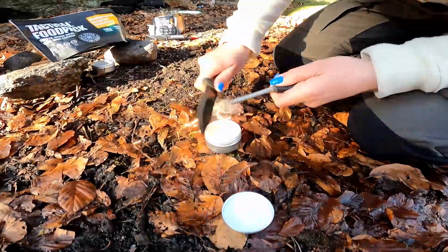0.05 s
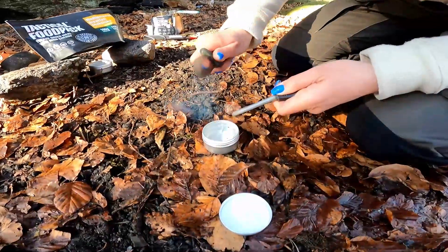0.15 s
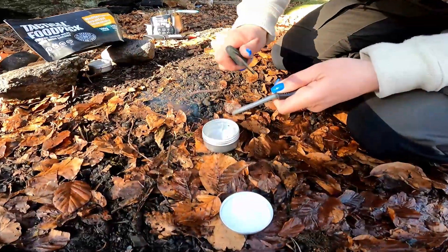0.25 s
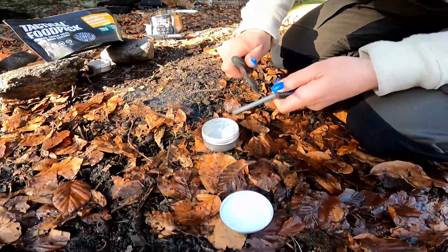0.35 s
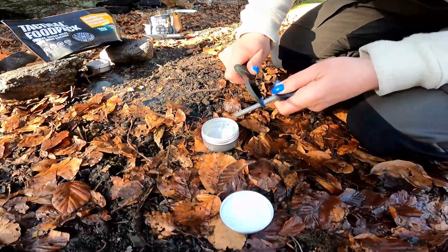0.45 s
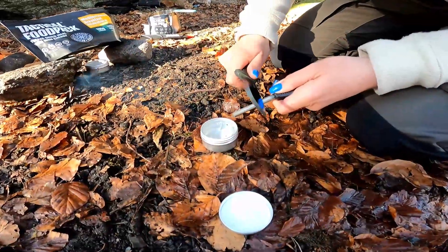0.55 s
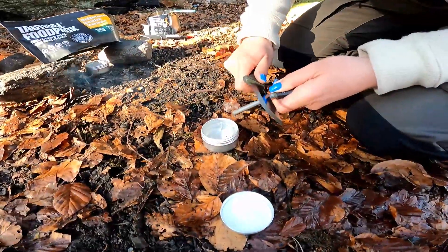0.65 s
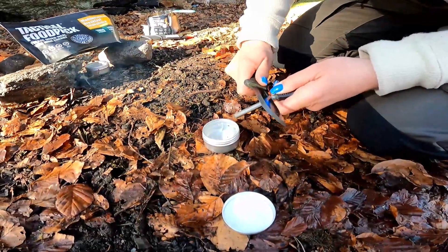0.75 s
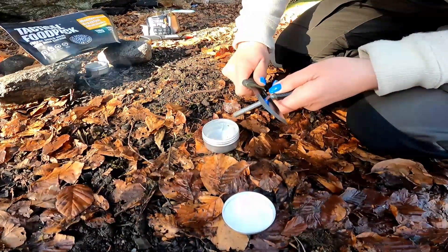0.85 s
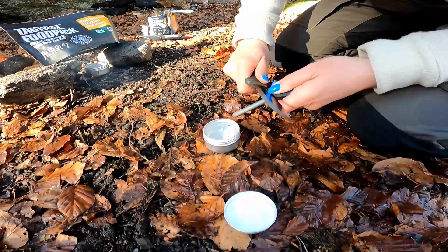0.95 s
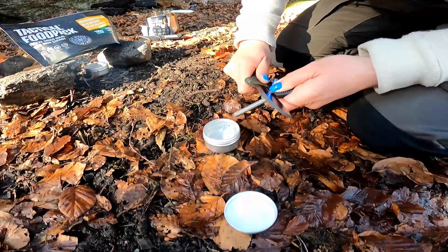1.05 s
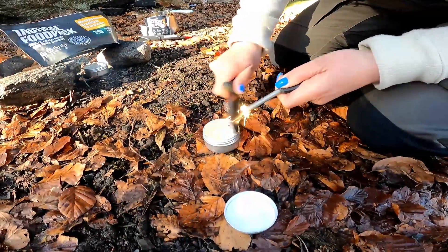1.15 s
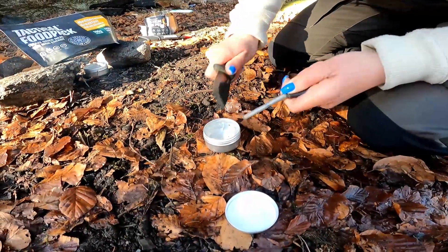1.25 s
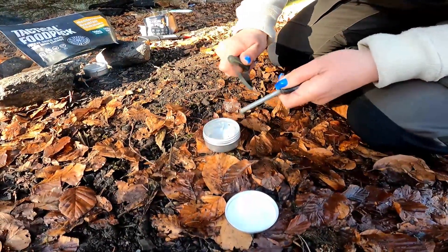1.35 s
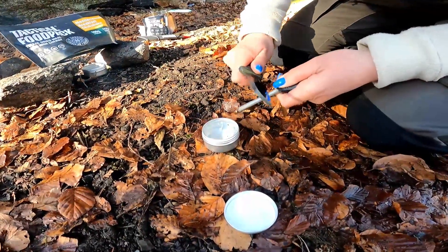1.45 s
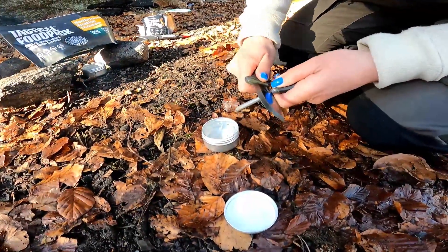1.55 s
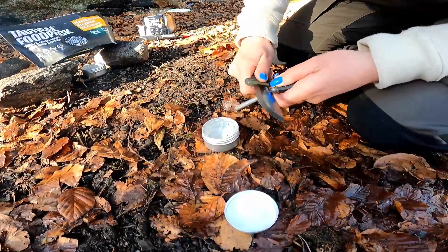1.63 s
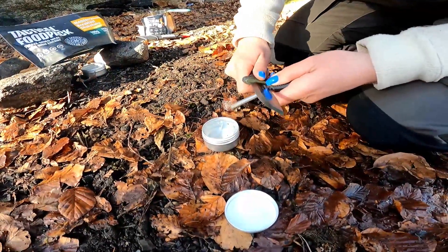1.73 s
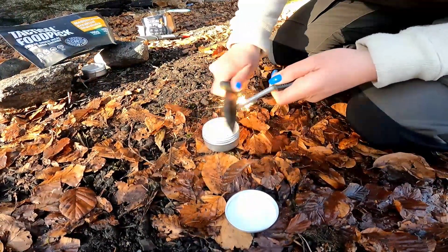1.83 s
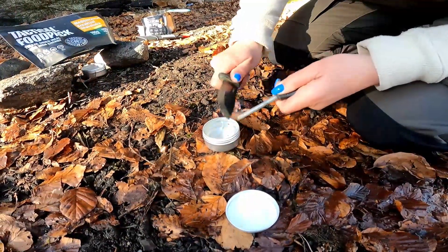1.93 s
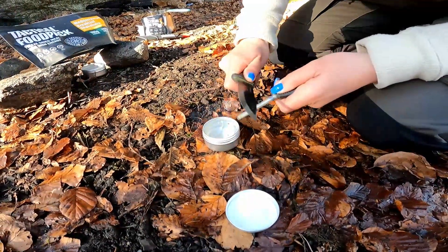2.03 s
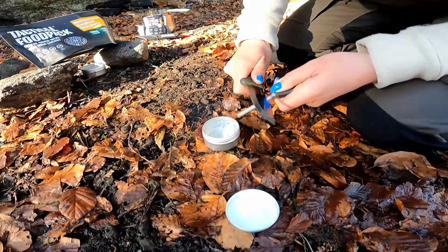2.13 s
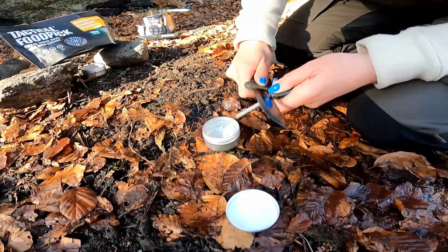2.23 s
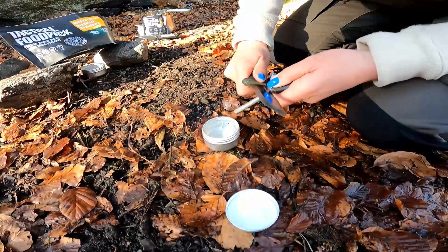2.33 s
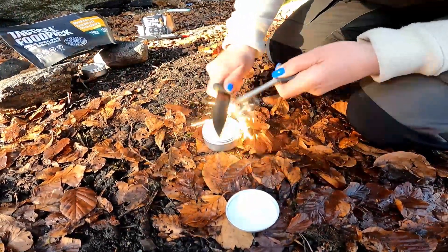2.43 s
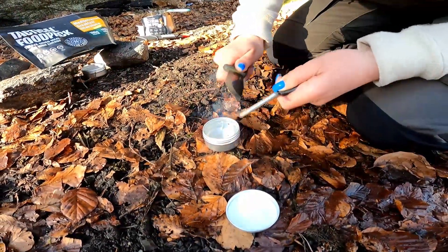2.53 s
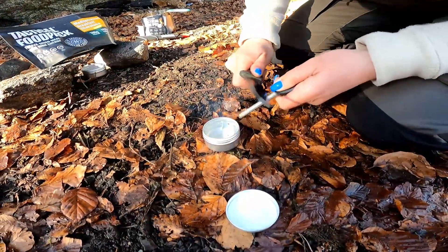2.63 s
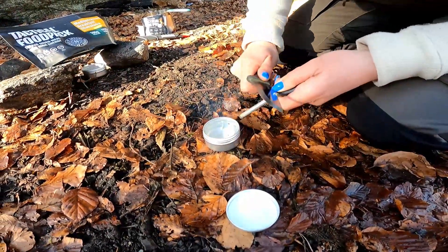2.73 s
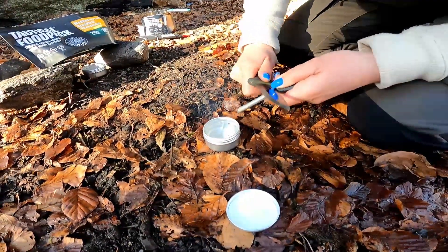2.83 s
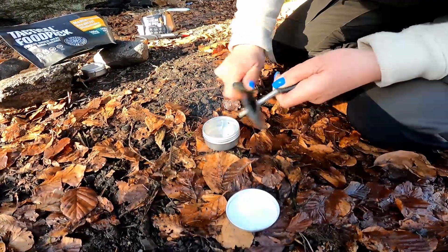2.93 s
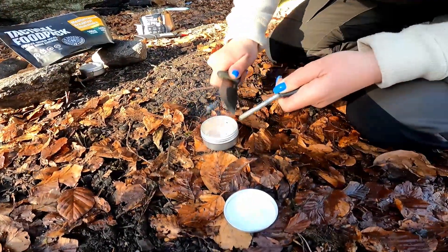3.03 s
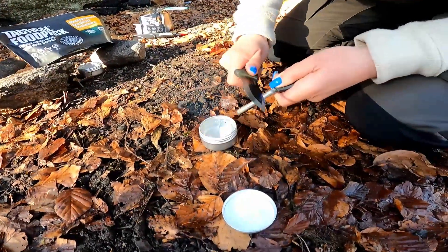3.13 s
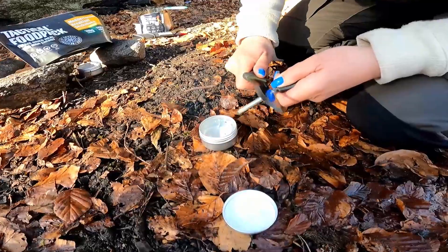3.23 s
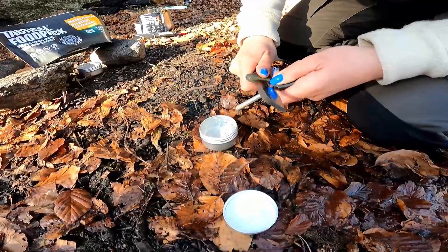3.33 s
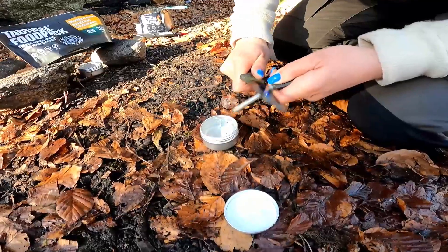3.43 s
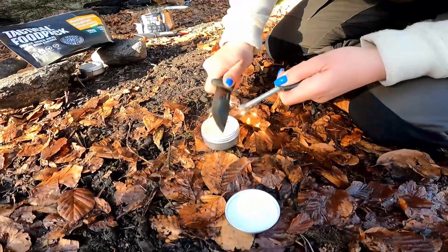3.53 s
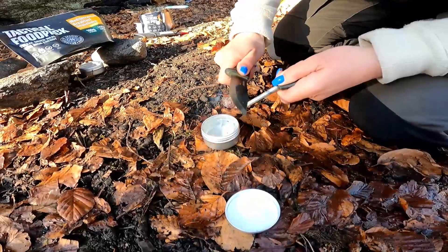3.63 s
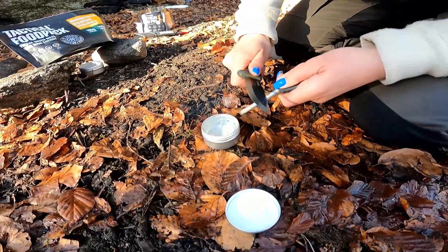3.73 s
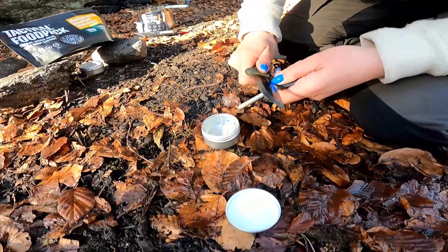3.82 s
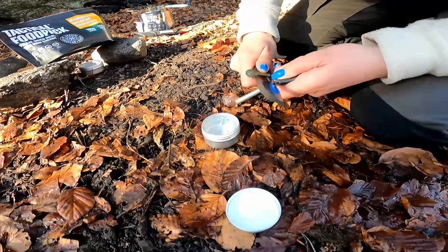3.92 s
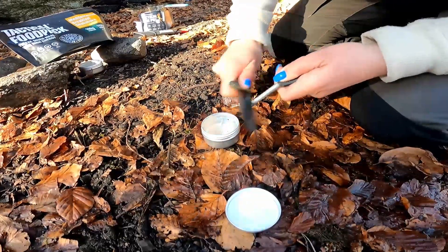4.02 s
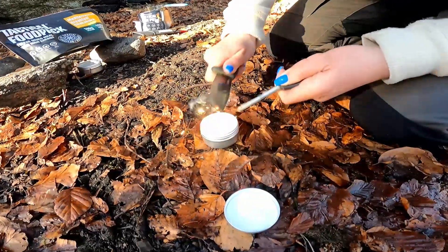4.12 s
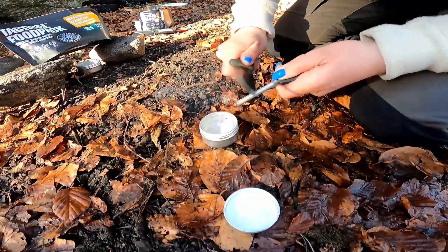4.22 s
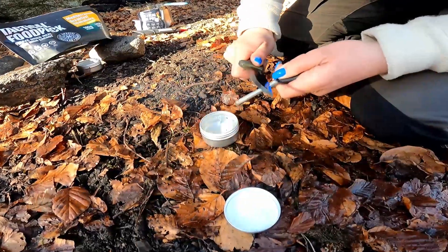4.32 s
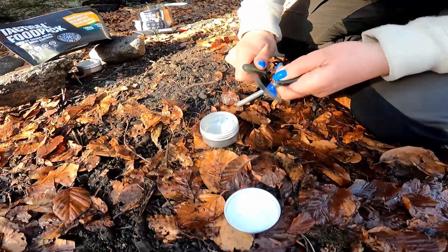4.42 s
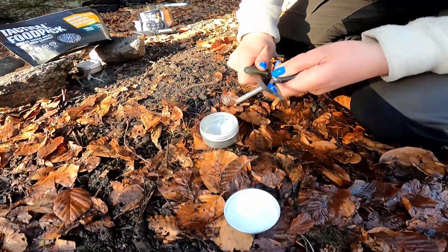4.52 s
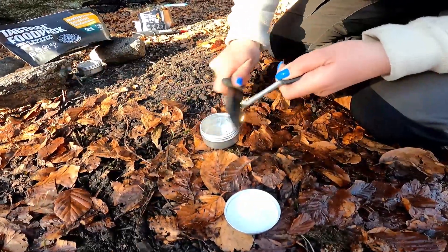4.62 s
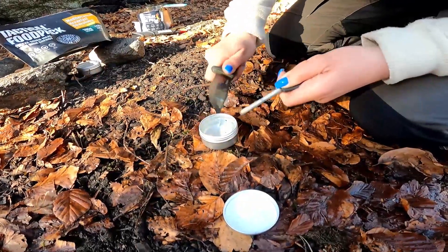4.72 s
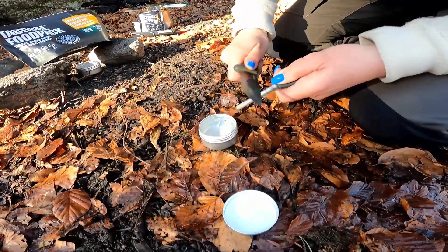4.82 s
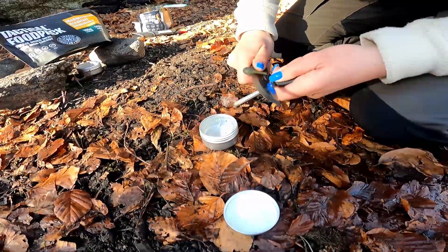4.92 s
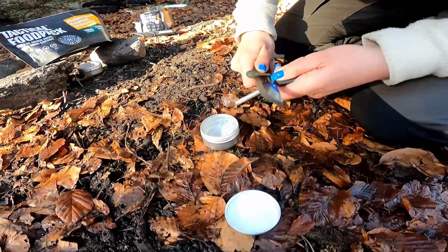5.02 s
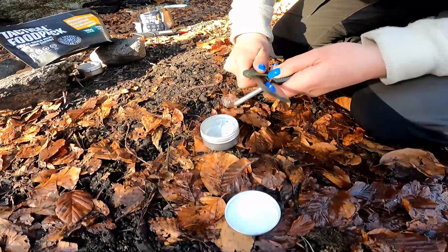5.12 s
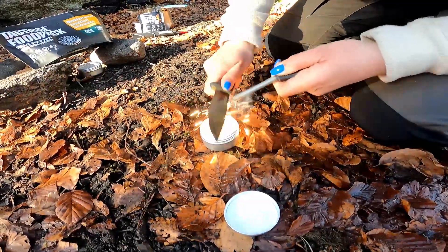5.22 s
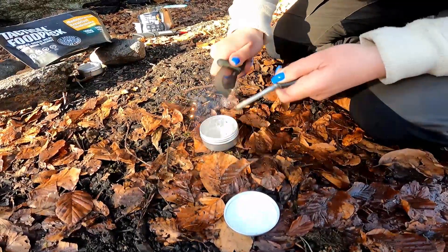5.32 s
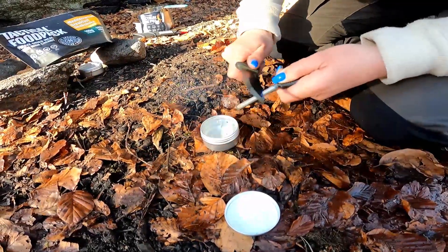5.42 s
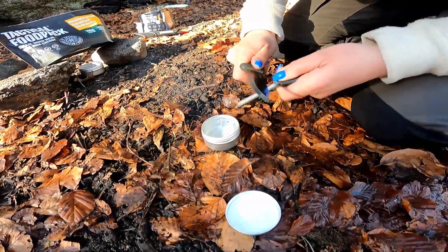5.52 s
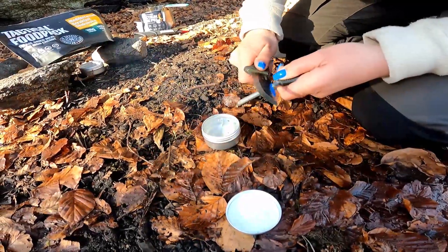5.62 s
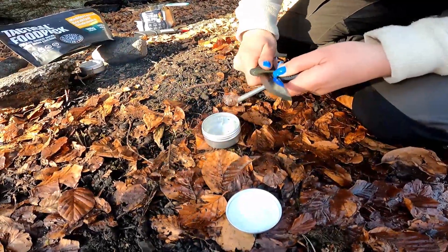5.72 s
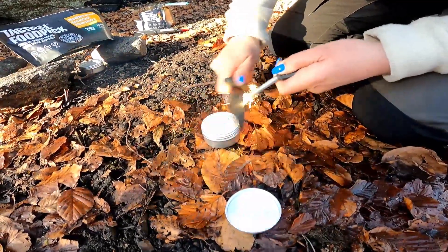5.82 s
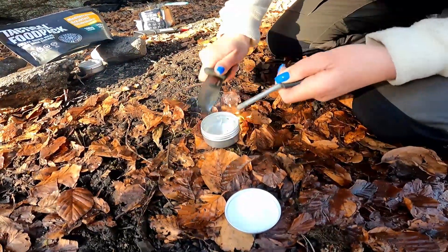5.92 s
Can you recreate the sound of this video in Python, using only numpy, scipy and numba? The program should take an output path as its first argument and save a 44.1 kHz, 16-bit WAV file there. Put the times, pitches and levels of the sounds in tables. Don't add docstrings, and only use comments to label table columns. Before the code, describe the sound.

Very close to the microphone outdoors, a hard steel edge scrapes a thin fire rod nine times in six seconds. Each scrape is a brief, harsh, gritty zip that builds fast, drops slightly in pitch and ends crunchy. Short choked metallic clicks come before most strokes. Tiny ticks of sparks and leaves follow, over soft forest air and a faint wavering low hum.

```python
import sys
import numpy as np
from scipy import signal
from scipy.io import wavfile
from scipy.ndimage import uniform_filter1d
from numba import njit

SR = 44100
rng = np.random.default_rng(int(sys.argv[2]) if len(sys.argv) > 2 else 0)


def wav_out(sig):
    wavfile.write(sys.argv[1], SR, np.round(np.clip(np.atleast_2d(sig).T, -1, 1) * 32767).astype(np.int16))


def level_to_linear(level):
    exponent = np.asarray(level, float) / 20
    return 10 ** exponent


N = 262836

# edge_bites [s], full_pressure [s], pressure_eases [s], edge_clear [s], level [dB]
STROKE_TIMES = [
    (0.132, 0.206, .238, .31, -10),
    (1.303, 1.35, 1.376, 1.405, -11),
    (1.978, 2.019, 2.066, 2.121, -14),
    (2.554, 2.597, 2.636, 2.712, -9.5),
    (3.085, 3.126, 3.188, 3.24, -15),
    (3.636, 3.665, 3.716, 3.783, -14.5),
    (4.181, 4.22, 4.272, 4.37, -12),
    (4.764, 4.794, 4.842, 4.89, -16.5),
    (5.334, 5.358, 5.424, 5.5, -12),
]
# pitch [hz], width [hz], level [dB]
CRUNCH_BODY = [(193, 152, 4.5), (372, 804, 5), (770, 670, -1.5), (1810, 500, 7), (2497, 684, 12)]
BITE_S = 0.012
COPY_LAG_S = 0.0105


def level(x, db):
    return x * level_to_linear(db) / np.sqrt(np.mean(x ** 2))


@njit
def svf(x, hz, width):
    out, band_state, low_state = np.empty(len(x)), 0., 0.
    for i in range(len(x)):
        g = np.tan(np.pi * hz[i] / SR)
        k = width / hz[i]
        v = (band_state + g * (x[i] - low_state)) / (1 + g * (g + k))
        band_state = 2 * v - band_state
        low_state = low_state + 2 * g * v
        out[i] = k * v
    return out


def band(x, hz, width_hz):
    centre_hz = np.clip(hz * np.ones(N), 20, 0.45 * SR)
    return svf(x + 1e-18, centre_hz, 1. * width_hz)


def body(x, peaks):
    return sum(level_to_linear(db) * band(band(x, hz, width_hz), hz, width_hz) for hz, width_hz, db in peaks)


def walk(rate):
    k = int(SR / rate)
    held = np.repeat(rng.standard_normal(N // k + 1), k)
    return 0.77 * uniform_filter1d(uniform_filter1d(held, k), k)[:N]


def grit(rate, scatter_db):
    chance, size, sign = rng.random(N), rng.exponential(size=N), rng.standard_normal(N)
    return (chance < rate / SR) * level_to_linear(scatter_db * np.minimum(size, 3)) * sign / np.sqrt(rate)


def ring(hz, t60, rise_s):
    t = np.arange(SR // 20) / SR
    return np.sin(2 * np.pi * hz * t) * np.exp(-np.log(1000) * t / t60) * (1 - np.exp(-t / rise_s))


def burst(fall_s):
    t = np.arange(SR // 20) / SR
    return rng.standard_normal(len(t)) * np.exp(-t / fall_s) * (1 - np.exp(-t / 0.00011))


def add(out, s, sound):
    i = int(s * SR)
    out[i:i + len(sound)] += sound[:N - i]


def hand():
    # start [s], length [s], level [dB], pitch [hz]
    rubs = [
        (0.071, 0.026, -32.5, 3446),
        (1.117, .038, -29.5, 3310),
        (1.234, .025, -36, 3490),
        (1.853, .038, -35, 3230),
        (4.365, 0.054, -33, 2890),
        (5.223, 0.059, -30.5, 3300),
    ]
    crunch_levels = (-21.5, -19, -8, -2.5)
    fizz_levels = (-36, -26, -23.5, -20)
    contact_pitch = (3550, 3530, 3436, 2730)
    silent_db, build_db_per_s, clear_db = -46.5, 329, -43
    lift_share, lift_db = 0.19, -12.5
    t = np.arange(N) / SR
    motion = np.array([np.full(N, v) for v in (-120., 0., 0., 3200., 0., 0.)])
    for bite, full, ease, clear, db in STROKE_TIMES:
        on = (t >= bite) & (t <= clear)
        gripped, lifted = bite + BITE_S, ease + lift_share * (clear - ease)
        gripped_db = -2.5 - build_db_per_s * (full - gripped)
        motion[0, on] = db + np.interp(t[on], [bite, gripped, full, ease, lifted, clear],
                                       [silent_db, gripped_db, 0, 0, lift_db, clear_db])
        moments = [bite, full, ease, clear]
        for row, values in enumerate((crunch_levels, fizz_levels, contact_pitch)):
            motion[row + 1, on] = np.interp(t[on], moments, values)
        motion[4, on] = np.interp(t[on], [bite, clear], [0, 1])
    for s, length, db, hz in rubs:
        on = (t >= s) & (t <= s + length)
        along = (t[on] - s) / length
        motion[0, on] = db - 19 * (2 * along - 1) ** 2
        motion[1, on], motion[2, on], motion[3, on] = -14, -40, hz
        motion[4, on] = along
        motion[5, on] = -8
    return motion


def strokes(motion):
    # pitch [hz], width [hz], level [dB]
    rod_modes = [(3230, 530, 3), (3684, 210, 1), (4193, 380, 4.5), (4910, 650, -0.5), (5590, 870, -4),
                 (6860, 180, -11)]
    pressure_db, crunch_db, fizz_db, hz, along, rod_db = motion
    gain = level_to_linear(pressure_db)
    thinning = level_to_linear(-30 * along ** 2.5)
    slips = grit(12000 * thinning, 0.94) * level_to_linear(4.6 * walk(250) + 0.76 * walk(70))
    contact_hz = hz * (1 + 0.12 * walk(100))
    free_end = level(band(band(slips, contact_hz, 900), contact_hz, 900), 8.5)
    whole_rod = level_to_linear(rod_db) * level(body(slips, rod_modes), 11)
    rod = level(whole_rod + free_end, 0)
    crumbs = level(grit(2500 * thinning, 0.88), 0)
    crunch = level(body(0.89 * level(slips, 0) + crumbs, CRUNCH_BODY), 5.26)
    fizz = level(band(band(slips, 11300, 2300), 11300, 3400), 0)
    mix = level_to_linear(-3.0) * rod + level_to_linear(crunch_db) * crunch + level_to_linear(fizz_db) * fizz
    return uniform_filter1d(gain, size=99) * mix


def snags(motion, count=5):
    rows = []
    for bite, full, ease, clear, db in STROKE_TIMES:
        place, size, pitch = rng.random(count), rng.standard_normal(count), rng.standard_normal(count)
        s = bite + BITE_S + (np.arange(count) + place) / count * (ease - bite)
        pressure_db, crunch_db, _, hz = motion[:4, (s * SR).astype(int)]
        rows += zip(s, pressure_db + 2 * size, hz * np.exp(0.23 * pitch), crunch_db + 3)
    return rows


def catches(lesser):
    # start [s], level [dB], pitch [hz], crunch [dB against the ring]
    hardest = [(0.2106, -2.5, 2155, -18.5), (0.2312, -3.5, 3820, -7), (0.222, -4, 3100, 6),
               (1.361, 0, 2520, -34), (1.3698, 6, 3750, -32.5), (1.9938, -11.5, 3416, -28),
               (2.0125, -6, 3960, -26), (2.0435, -2, 2900, -11.5), (2.6066, -10, 3325, 2),
               (2.615, 2, 4560, -8), (3.1264, -9.5, 4000, -23.5), (3.166, -3.5, 4335, -12),
               (3.184, -7, 2690, -2), (3.195, -14, 2750, 0), (3.6662, -9.5, 3170, -21),
               (3.6792, -8.5, 4060, -3), (3.7082, -2.5, 3637, -31), (4.213, -4.5, 3275, -42.5),
               (4.238, -5, 4840, -4), (4.2485, 3, 3890, -14), (4.2668, -7, 2790, -3),
               (4.2945, -11, 2590, -9.5), (4.2722, -5, 2560, -2), (4.7925, -10, 3070, -25),
               (4.8392, 0, 3910, -16), (5.366, -5.5, 4030, -27), (5.3582, -1, 4020, -30),
               (5.397, -2, 3880, -2.5), (5.4061, -2.5, 3906, -7), (5.4213, -2.5, 2630, -5.5)]
    rows = hardest + lesser
    out, spray, knock = np.zeros(N), np.zeros(N), np.zeros(N)
    chance = rng.random((len(rows), 1))
    for (s, db, hz, crunch_db), (a,) in zip(rows, chance):
        bite = ring(hz, 0.009, 0.0006) + 0.5 * ring(hz * (0.8 + 0.5 * a), 0.006, 0.0004)
        judder = np.convolve(burst(0.0065), ring(hz, 0.01, 0.0001)[:400])[:len(bite)]
        add(out, s, level_to_linear(db + 2.5) * (bite + level_to_linear(-28.0) * judder))
        add(spray, s, level_to_linear(db) * burst(0.0026))
        add(knock, s, level_to_linear(db + crunch_db) * burst(0.0037))
    sizzle = level_to_linear(-3) * band(band(spray, 4600, 3000), 4600, 3500)
    hiss = level_to_linear(-27) * band(band(spray, 11200, 3400), 11200, 4200)
    return out + sizzle + hiss + level_to_linear(1.5) * body(knock, CRUNCH_BODY[:4])


def taps():
    # start [s], peak [dB], main ring pitch [hz], upper modes [dB against the ring]
    touches = [
        (0.8726, -8, 3230, -5),
        (1.7773, -5.5, 3253, -6),
        (2.441, -6.5, 3300, -11),
        (2.9838, 1, 3250, -7.5),
        (3.481, -6, 3168, -10),
        (4.0809, 3, 3156, -7),
        (4.6703, -5, 3158, -1.5),
        (5.1571, -11, 3170, -16),
        (5.892, -4, 3184, -11.5),
    ]
    # pitch [hz], level [dB], decay t60 [s]
    low_modes = [(375, -4.5, 0.016), (1206, 9.5, 0.0095), (1900, 1, 0.014), (2350, 2, 0.013)]
    upper_modes = [(3950, 1, 0.01), (4258, 0, .009)]
    edge_modes = [(4705, -6.5, 0.013), (5510, 4.5, 0.009), (6440, -5, 0.011), (7780, -19.5, 0.0028)]
    out = np.zeros(N)
    chance = rng.standard_normal((len(touches), 3))
    for (s, db, hz, upper_db), (a, b, c) in zip(touches, chance):
        low_db, edge_db = -16.5 - 0.45 * db, -16 - 0.45 * db
        low = sum(level_to_linear(d) * ring(f * (1 + 0.047 * a), t60, 0.00087) for f, d, t60 in low_modes)
        upper = sum(level_to_linear(d) * ring(f * (1 + 0.062 * b), t60, 0.00031) for f, d, t60 in upper_modes)
        edge = sum(level_to_linear(d) * ring(f * (1 + 0.011 * c), t60, 0.00033) for f, d, t60 in edge_modes)
        crack = np.diff(burst(0.0012), 2, prepend=[0, 0])
        rattle = np.convolve(burst(0.016), ring(hz * 1.27, 0.00067, 0.00019)[:200])[:len(low)]
        rattle = np.roll(rattle, int(COPY_LAG_S * SR))
        t = np.arange(len(low)) / SR
        settle = np.exp(-t / 0.0042) - 0.3
        falloff = np.exp(-(t / 0.0071) ** 2)
        main = ring(hz * (1 + 0.07 * settle), 0.018, 0.00047) * falloff
        side_modes = level_to_linear(low_db - 4.0) * low + level_to_linear(upper_db) * upper + level_to_linear(edge_db) * edge
        add(out, s, level_to_linear(db + 4) * (main + side_modes + level_to_linear(-47.5) * crack + level_to_linear(-41.0) * rattle))
    return out


def ticks():
    # start [s], level [dB], pitch [hz], high spit [dB against the tick]
    small_hits = [(0.2572, -6.5, 2900, -28.5), (0.2672, -8, 3450, -49), (0.2843, -24, 2287, -30),
                  (1.1434, -17.5, 4300, -33), (1.2442, -28, 3360, -36), (1.4334, -36, 4230, -12),
                  (2.6733, -24.5, 2000, -31), (1.8833, -27.5, 3260, -47), (2.089, -21, 2230, -30),
                  (2.1778, -33, 1940, -32), (2.2009, -34.5, 1900, -7), (2.3894, -35.5, 5100, -9),
                  (2.718, -35.5, 2160, -16), (2.7594, -35.5, 5450, -24), (2.9153, -34.5, 3700, -17),
                  (3.2211, -30.5, 1934, -30), (3.289, -26.5, 2830, -39), (3.789, -23, 2207, -25),
                  (2.0679, -13.5, 2300, -30), (4.0324, -38, 2200, -12), (4.3252, 1.5, 3045, -24),
                  (4.382, -31, 3070, -32), (4.3994, -32, 1980, -15), (4.4143, -23.5, 2880, -31),
                  (5.2495, -24, 3030, -37), (5.506, -33, 2930, -39), (5.5166, -26, 2050, -34),
                  (5.527, -21, 2980, -37), (5.5523, -33.5, 2890, -42), (5.4452, -15, 3360, -32)]
    out, snap, spit = np.zeros(N), np.zeros(N), np.zeros(N)
    for s, db, hz, spit_db in small_hits:
        add(out, s, level_to_linear(db + 0.5) * ring(hz, 0.0045, 0.000067))
        add(snap, s, level_to_linear(db + 2.5) * burst(0.0014))
        add(spit, s, level_to_linear(db + spit_db + 15.5) * burst(0.0012))
    high_crackle = level(band(grit(60, 3.3), 11500, 3000), -90.5)
    crackle = high_crackle + level(band(grit(80, 2.5), 4300, 2500), -75)
    snap = band(band(snap, 4200, 3100), 4400, 4100)
    spit = band(band(spit, 14000, 4100), 15000, 3500)
    return out + snap + spit + crackle


def forest(near):
    # pitch [hz], level [dB per Hz]
    air_levels = [(25, -56), (69, -16), (191, -4), (383, -12), (1100, -17), (5280, -30.5), (9020, -53.5),
                  (12100, -46.5)]
    # time [s], pitch [hz], level [dB]
    motor = [(0.0, 83.5, -47), (1.06, 82.8, -48), (1.48, 82.5, -56), (2.092, 83.8, -49), (2.82, 82, -53),
             (3.469, 80, -58.5), (3.6, 82, -69), (4.2, 83, -61.5), (4.9, 81, -74.5), (5.46, 81.6, -53),
             (5.96, 80.8, -55.5)]
    # pitch [hz], width [hz], level [dB]
    drone_bands = [(176.8, 10, -51), (205.2, 2.1, -51), (267.6, 15, -54.5), (337.4, 29, -54)]
    t = np.arange(N) / SR
    s, hum_hz, hum_db = np.transpose(motor)
    air_hz, air_db = np.transpose(air_levels)
    bass_db = 0.15 * np.interp(t, s, hum_db)
    bass_swell_db = bass_db - bass_db.mean()
    trees_db, trees_t60_s, earlier_db = 24.5, 0.65, -16
    fade = level_to_linear(-120 / (trees_t60_s * SR))
    wash = signal.lfilter([1 - fade], [1, -fade], near ** 2, zi=[level_to_linear(earlier_db) ** 2])[0]
    treble_db = 10 * np.log10(1 + level_to_linear(2 * trees_db) * wash)
    air = 0
    for hz in 30 * 2 ** np.arange(0, 8.9, 1 / 3):
        db = np.interp(np.log(hz), np.log(air_hz), air_db)
        treble_share = np.clip(np.log2(hz / 300) / 1.5, 0, 1)
        follow = 1 + 1.7 * (hz < 110)
        swell_db = (1 - treble_share) * follow * bass_swell_db + treble_share * (treble_db - 5)
        noise = band(band(rng.standard_normal(N), hz, hz / 3), hz, hz / 3)
        air = air + level_to_linear(db + swell_db + 0.5 * walk(9)) * noise
    phase = np.cumsum(np.interp(t, s, hum_hz) + 2.6 * walk(8.4)) / SR
    hum_gain = np.sqrt(2) * level_to_linear(np.interp(t, s, hum_db) + 0.52 * walk(24))
    hum = hum_gain * np.sin(2 * np.pi * phase)
    drone = sum(level(band(rng.standard_normal(N), f, w), d) for f, w, d in drone_bands)
    return level(air, -45.5) + hum + drone * level_to_linear(bass_swell_db)


def scene():
    motion = hand()
    near = strokes(motion) + catches(snags(motion)) + taps() + ticks()
    near = signal.sosfilt(signal.butter(2, 110, "high", fs=SR, output="sos"), near)
    dull, lag = band(near, 3600, 4300), int(COPY_LAG_S * SR)
    copies = 0
    for k in range(2):
        after, before = np.roll(dull, lag * (k + 1)), np.roll(dull, -lag * (k + 1))
        copies = copies + level_to_linear(-23 - 15 * k) * (after + 0.35 * before)
    mono = near + copies + forest(near)
    return np.array([mono, mono])


def band_limit(x):
    return signal.sosfilt(signal.butter(12, 16170, fs=SR, output="sos"), x)


def record(dry):
    mid = 1.5 * np.tanh(dry[0] / 1.5)
    mid = mid - 0.95 * band(mid, 9050, 750)
    mid = signal.sosfilt(signal.cheby2(8, 45, 14740, fs=SR, output="sos"), mid)
    scatter = np.interp(np.arange(N) - 30 - 6 * walk(44), np.arange(N), mid)
    top = band(band(mid, 12800, 4500), 10000, 6000)
    side = 1.1 * band(band(scatter, 12600, 4000), 12600, 5000) - 0.32 * top
    side = side + 0.12 * band(scatter, 8600, 3500) + 0.016 * scatter
    both = np.clip([mid + side, mid - side], -1, 1)
    return band_limit(both)


dry = scene()
out = record(dry)
wav_out(out)
```